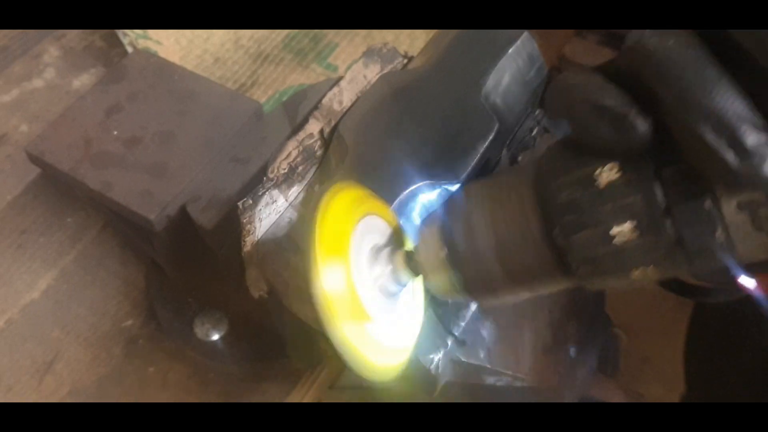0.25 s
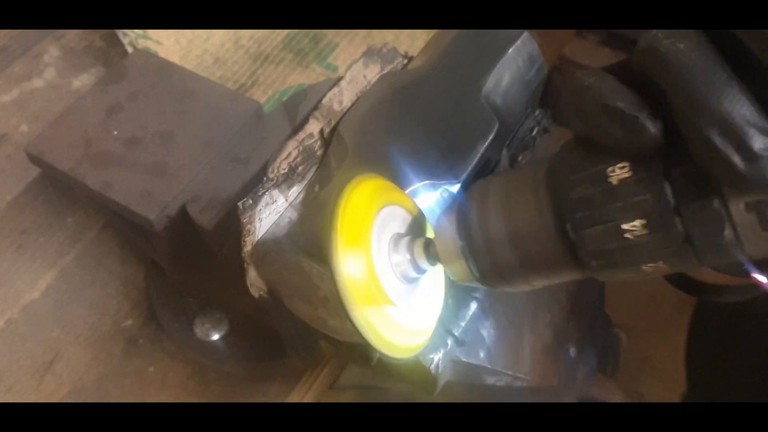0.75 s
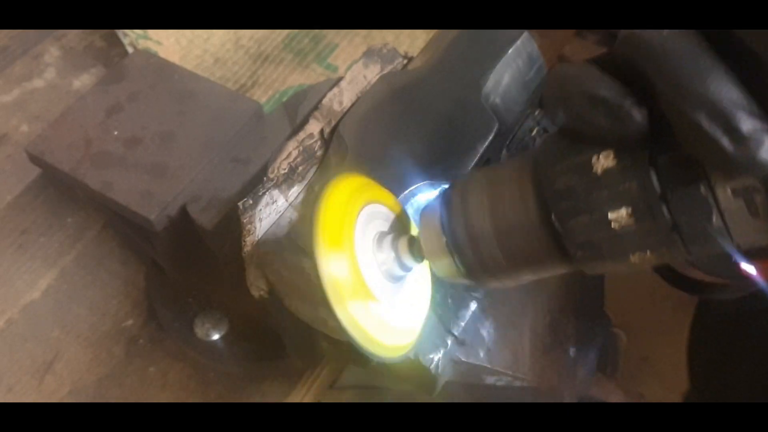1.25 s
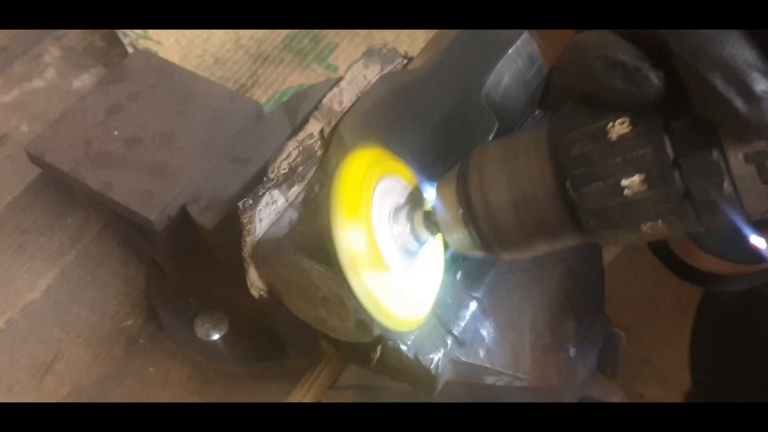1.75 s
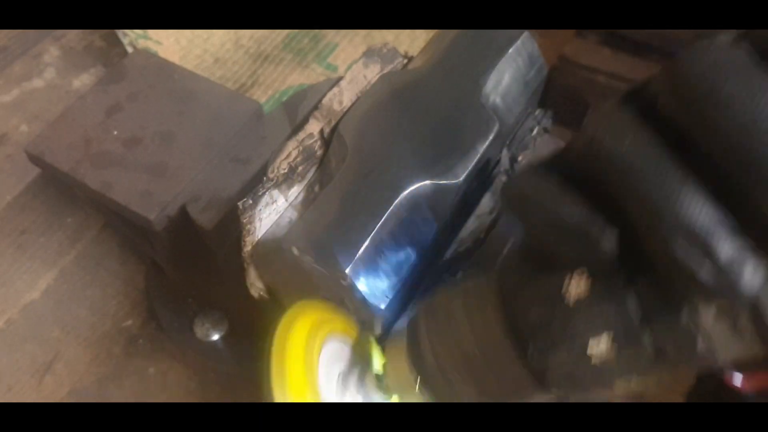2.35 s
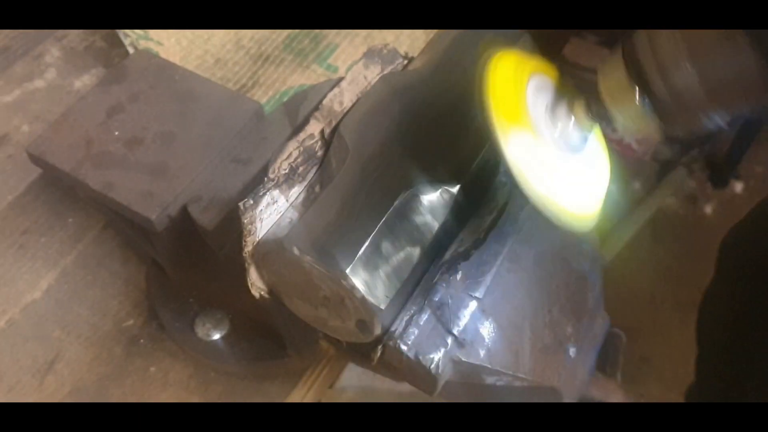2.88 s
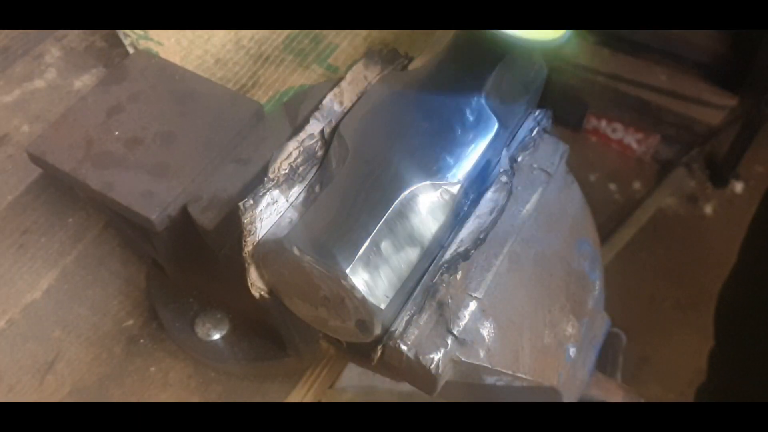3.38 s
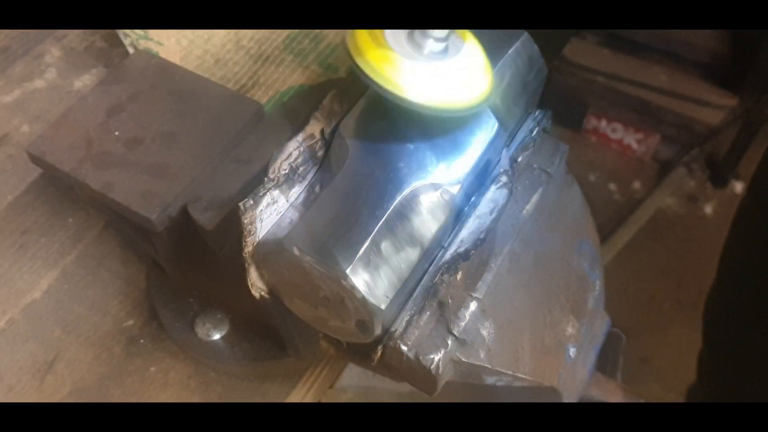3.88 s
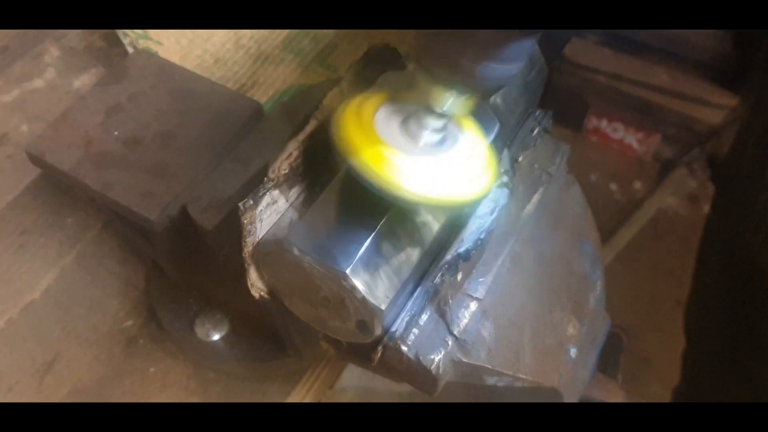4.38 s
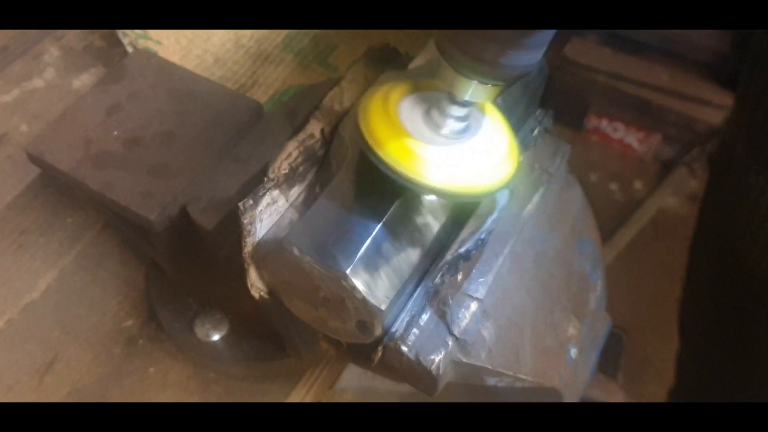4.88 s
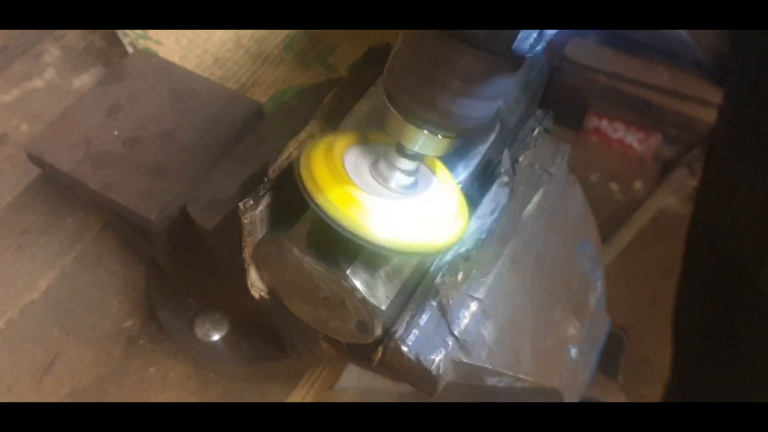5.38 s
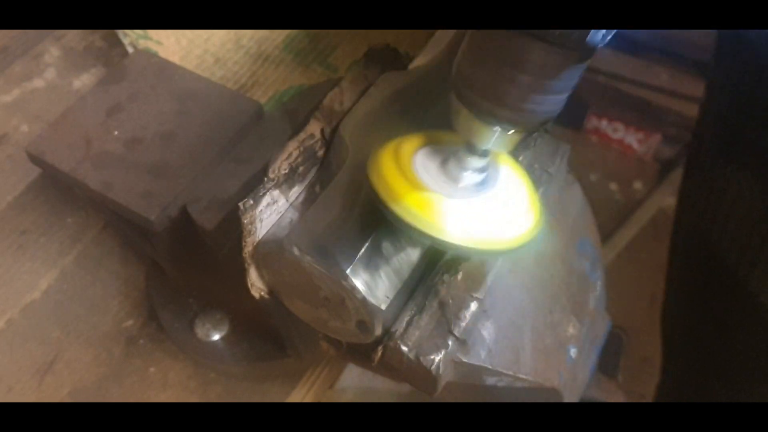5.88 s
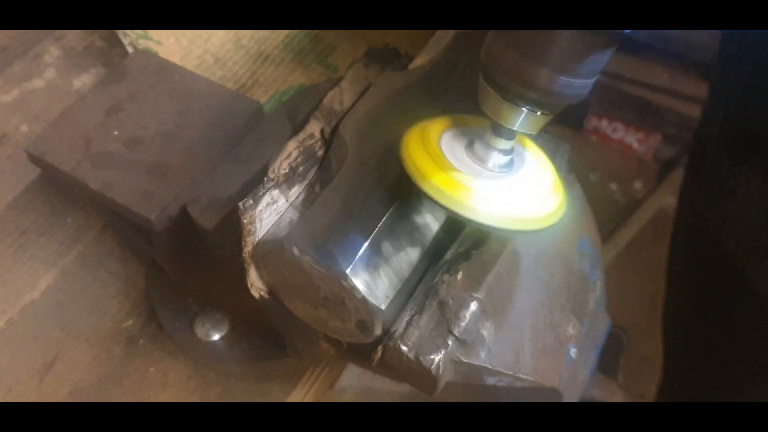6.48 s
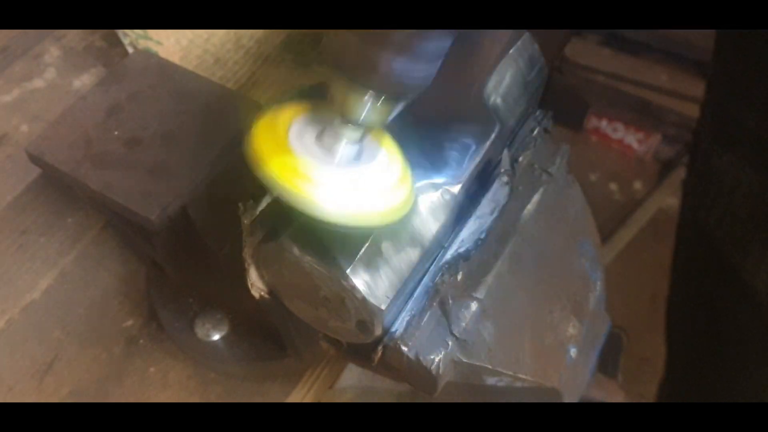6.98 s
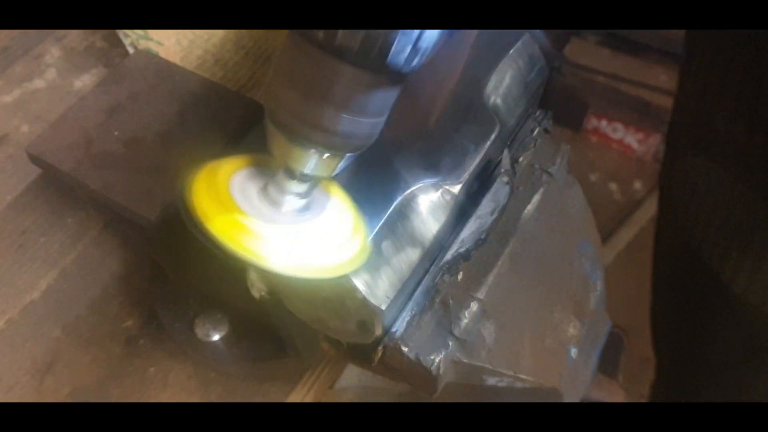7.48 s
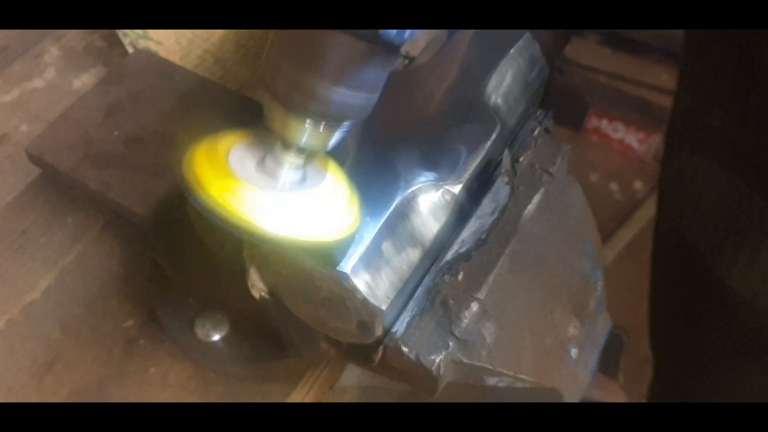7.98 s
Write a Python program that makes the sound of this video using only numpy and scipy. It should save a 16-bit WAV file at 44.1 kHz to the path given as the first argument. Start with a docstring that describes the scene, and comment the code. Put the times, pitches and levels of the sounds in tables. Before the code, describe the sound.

Workshop bench, close and dry: a steady, bright motor whine with a fast-throbbing rubbing hiss on steel, strongly on the left. On the right the drill is muffled, with irregular puffs of air from the spinning pad until about three seconds. The pitch rises a little when the drill lifts off, then sags slightly as it presses upright, with a faint low hum.

```python
"""A cordless drill whines close to the left microphone, polishing a steel hammer head held in a vice.
Motor shaft orders make the whine; low chuck orders hum, and throbbing noise is the fan, gear and pad hiss.
The drill starts sideways, lifts off and runs free, then leans and stands upright on the steel, turning slower.
The right microphone is nearly blocked: it hears a faint dull drill and the thumping air thrown by the pad."""
import sys
import numpy as np
from scipy import signal
from scipy.fft import rfft, irfft, next_fast_len
from scipy.io import wavfile
from scipy.ndimage import uniform_filter1d

SR = 44100
rng = np.random.default_rng(int(sys.argv[2]) if len(sys.argv) > 2 else 0)


def waveform_to_disk(signal):
    """Save audio, clipped to [-1, 1], as 16-bit WAV at the path in sys.argv[1]."""
    frames = np.transpose(np.atleast_2d(signal))
    scaled = np.clip(frames, -1, 1) * 32767
    samples = np.round(scaled).astype(np.int16)
    wavfile.write(sys.argv[1], SR, samples)


N = 363384
T = np.arange(N) / SR  # s
GEAR = 15  # shaft turns per chuck turn


def whine(turn, pose):
    """Sines at multiples of the shaft speed; bearings and brushes make each waver in level and phase."""
    # strong shaft orders: order, level/dB sideways, lifted, leaning, upright
    strong_orders = [(1, -39.3, -37.8, -39, -39.5), (2, -44, -34.5, -38.5, -37), (3, -40, -46, -43, -45),
                     (4, -33, -32.3, -30, -27.5), (5, -36.5, -42, -42, -42), (10, -32, -32.5, -33.5, -34)]
    # weaker shaft orders: order, level/dB sideways, lifted, leaning, upright
    weak_orders = [(6, -46, -67, -58, -61), (7, -50, -46, -43, -42), (8, -47, -43, -51, -45),
                   (9, -45, -48, -44, -52), (11, -46, -43, -43, -49), (12, -48, -67, -49, -46),
                   (13, -42, -44, -45, -44), (14, -56, -42, -46, -51), (15, -44, -47, -44, -48),
                   (16, -43, -47, -48, -51), (17, -51, -65, -53, -48), (18, -52, -55, -60, -53),
                   (19, -59, -54, -54, -53), (20, -56, -53, -56, -55), (21, -56, -65, -58, -62),
                   (22, -58, -58, -56, -59), (24, -60, -67, -67, -65), (25, -58, -67, -67, -67),
                   (30, -49, -52, -53, -56), (31, -61, -59, -59, -63), (32, -67, -59, -65, -64),
                   (33, -61, -57, -53, -54), (34, -44, -46, -45, -55), (35, -52, -53, -53, -54),
                   (36, -50, -49, -48, -53), (37, -50, -52, -50, -55), (38, -55, -50, -51, -50),
                   (39, -49, -52, -50, -57), (40, -49, -47, -47, -50), (41, -52, -51, -45, -46),
                   (42, -52, -51, -51, -58), (43, -59, -64, -51, -55), (44, -53, -57, -54, -51),
                   (45, -57, -53, -49, -49), (46, -55, -57, -56, -58), (47, -65, -62, -61, -58),
                   (48, -59, -62, -66, -62), (49, -56, -60, -61, -63), (50, -54, -57, -56, -56),
                   (51, -53, -60, -59, -58), (52, -67, -67, -55, -55)]
    out, share = np.zeros(N), shares(pose, count=4)
    for order, *pose_db in strong_orders:
        level = amp(np.dot(pose_db, share) + swell(round(order)) + 0.86 * drift(25))
        phase = round(order) * turn + 0.22 * drift(15) + 2 * np.pi * rng.random()
        out += level * np.sqrt(2) * np.sin(phase)
    for order, *pose_db in weak_orders:
        waver_db = 1.5 * drift(2) + 1.2 * drift(25)
        level = amp(np.dot(pose_db, share) + swell(order) + waver_db)
        phase = order * turn + .2 * drift(15) + 2 * np.pi * rng.random()
        out += level * np.sqrt(2) * np.sin(phase)
    return out


def swell(order):
    """Summed dB change of one order: smooth bumps in time as the drill shifts against the steel."""
    # swells and dips of single tones: t/s, shaft order, half length/s (to 1/e), level change/dB
    bumps = [(.1, 10, .3, 1.5), (.2, 2, 0.39, 5.5), (.9, 10, 0.29, -3.5), (1.3, 2, 0.11, 4.5),
             (1.45, 10, .22, 0.5), (2.1, 10, 0.34, -4), (2.605, 4, 0.16, 4), (2.618, 2, 0.12, 4.5),
             (2.7, 10, 0.25, 4), (3.0, 4, 0.31, -1.5), (3.032, 2, 0.12, -15.5), (3.05, 3, 0.12, -13),
             (3.096, 1, .07, 3), (3.1, 5, .07, -3), (3.098, 10, 0.084, -8), (3.75, 5, 0.11, -10),
             (3.88, 3, .1, -8), (3.897, 10, 0.12, 2.5), (3.9, 2, .15, 3), (4.05, 5, .07, -6),
             (4.27, 4, 0.19, -3.5), (6.28, 3, .22, -11), (6.5, 2, 0.32, -2.5), (7, 5, .15, -6),
             (8.24, 4, .07, -7), (.1, 15, .25, -10), (2.55, 15, 0.14, 0), (2.55, 16, .15, 5),
             (3.148, 15, .15, 4), (3.85, 14, 0.13, -5), (4.05, 16, .18, 4)]
    return sum(db * np.exp(-((T - s) / half) ** 2) for s, which, half, db in bumps if round(which) == order)


def chuck(turn):
    """The unbalanced pad hums into the vice and bench at multiples of the chuck speed."""
    # make-up of the hum: chuck order, relative level/dB
    chuck_orders = [(3, -10), (4, -0.5), (12, -10), (16, -4)]
    # course of the hum: t/s, level/dB
    hum_db = [(0, -60), (2.45, -59), (2.68, -69), (3.05, -66), (3.6, -62), (3.9, -56), (4.4, -54),
              (5.1, -60), (5.25, -57), (6.5, -52.5), (7, -54), (7.3, -55), (8.15, -56), (8.24, -64)]
    hum = np.zeros(N)
    for order, db in chuck_orders:
        level = amp(db + 1.8 * drift(8))
        hum += level * np.sin(round(order) * turn / GEAR + .4 * drift(6.2))
    return np.sqrt(2) * amp(curve(hum_db)) * hum


def hiss(turn, pose):
    """Fan, gears and rubbing pad: noise that throbs with every shaft turn and every pad turn."""
    # hiss spectrum before the level course: f/Hz, level/dB per Hz sideways, lifted, leaning or upright
    spectrum = [(40, -87, -86.6, -93), (200, -85.5, -83.5, -82.5), (417, -75.5, -74.5, -72),
                (500, -69.5, -71.5, -69), (730, -73, -73, -70), (830, -70.5, -67, -65),
                (1310, -61, -63.5, -62.5), (1510, -63, -67, -65), (2480, -66, -64.5, -63),
                (3540, -66, -64.5, -61), (5070, -66.5, -71.5, -70.5), (6650, -77, -81, -78),
                (7700, -88, -87, -87.5), (8860, -84.5, -87.5, -88.5), (11320, -73.5, -74, -72.5),
                (13700, -77.5, -80, -79.5)]
    # course of the hiss: t/s, level change/dB
    course_db = [(0, -0.5), (1.1, .4), (2.2, -.4), (2.6, 0), (3.5, -1), (3.85, 0), (4.2, -.8), (5.8, 0),
                 (6.4, -1), (7, -0.5), (7.8, .5), (8.12, 0.5), (8.24, -1)]
    shaft_throb = 0.13 * np.cos(turn) + 0.06 * np.cos(2 * turn + 0.92) + 0.042 * np.cos(3 * turn + 1.5)
    throb = 1 + shaft_throb + 0.027 * np.cos(turn / GEAR)
    white = rng.standard_normal(N) * np.sqrt(SR / 2)  # unit power per Hz
    noise = throb * amp(.5 * drift(8)) * white
    coloured = posed(patchy(noise, patchy_db=0.92), spectrum, np.minimum(pose, 2))
    return amp(curve(course_db)) * coloured


def patchy(x, patchy_db):
    """Lets small patches of time and frequency swell and fade, as the pad bites unevenly."""
    z = signal.stft(x, nperseg=256)[2]
    patches = uniform_filter1d(rng.standard_normal(z.shape), size=5, axis=0)  # across frequency
    patches = uniform_filter1d(patches, size=8, axis=1)  # along time
    gain = amp(patchy_db * patches / patches.std())
    return signal.istft(z * gain, nperseg=256)[1][:N]


def draught():
    """Each puff is a short soft swing with a quick edge and stirs up low turbulence around it."""
    # spectrum of the turbulence: f/Hz, relative level/dB
    air_spectrum = [(15, -30), (30, -17), (55, -1), (90, -12), (180, -25), (300, -32), (2000, -80)]
    # strong puffs that thump the right microphone: t/s, envelope peak level/dB, settled f/Hz
    strong_puffs = [(.482, -45, 55.4), (.895, -38, 70), (1.232, -38, 75), (1.402, -38, 90), (1.47, -39, 90),
                    (1.503, -32, 85), (1.572, -30, 101), (1.59, -31, 90), (1.626, -32, 130),
                    (1.66, -37, 70), (1.703, -38, 151), (1.723, -32, 78), (1.793, -41, 75),
                    (1.855, -41, 65), (1.937, -32, 70), (1.985, -34, 100), (2.022, -36, 90),
                    (2.072, -36, 110), (2.114, -35, 101), (2.13, -30, 94), (2.18, -35.5, 140),
                    (2.499, -34, 65), (2.535, -44, 80), (2.567, -39, 120), (3.042, -32, 94.5),
                    (3.09, -35, 99)]
    rumble = colour(rng.standard_normal(N), air_spectrum)
    out, stir, t = np.zeros(N), np.zeros(N), np.arange(4000) / SR
    puffs = strong_puffs + small_puffs()
    for (s, db, hz), phase in zip(puffs, rng.random(len(puffs))):
        u = t * hz / .6  # the envelope peaks 0.6 of a cycle in
        shape = amp(db) * u * np.exp(1 - u)
        swing = np.sin(2 * np.pi * (hz * t + phase - 0.68 * np.exp(-t / 0.0024)))  # starts fast, then slows
        start = round(s * SR)
        out[start:][:len(t)] += shape * swing
        stir[start:][:len(t)] += shape
    turbulence = uniform_filter1d(stir, size=3000) * rumble / rumble.std()
    return out + amp(-2.5) * turbulence


def small_puffs():
    """Rows like those of the strong puffs, scattered while the pad blows towards the microphone."""
    # gusts: start t/s, end t/s
    gusts = [(.87, 1.0), (1.12, 1.46), (2.2, 2.26), (2.43, 2.49), (3.0, 3.03), (3.13, 3.19)]
    gap_s = .045
    middle_db, spread_db, low_hz, high_hz = -47.5, 3, 55, 110
    at = np.concatenate([np.arange(start, end, gap_s) for start, end in gusts])
    late, size, pitch = rng.random((len(at), 3)).T
    times = at + gap_s * late / 2
    levels = middle_db + spread_db * (2 * size - 1)
    return list(zip(times, levels, low_hz + (high_hz - low_hz) * pitch))


def amp(db):
    """Decibels to gain."""
    return 10 ** (np.asarray(db) / 20)


def curve(rows, column=1):
    """One column of a table at every sample."""
    return np.interp(T, np.array(rows)[:, 0], np.array(rows)[:, column])


def colour(x, points, column=1):
    """Filters x by one dB column of a table whose first column is Hz."""
    size = next_fast_len(N)
    hz, p = np.fft.rfftfreq(size, 1 / SR), np.array(points)
    gain = amp(np.interp(np.log(hz + 1), np.log(p[:, 0]), p[:, column]))
    return irfft(rfft(x, size) * gain, size)[:N]


def drift(per_s):
    """Slow chance of about rms 1; a higher per_s wanders faster."""
    knots_hz = 400
    knots = rng.standard_normal(int(N / SR * knots_hz) + 2)
    knots = uniform_filter1d(knots, max(int(knots_hz / per_s), 1))
    return np.interp(T * knots_hz, np.arange(len(knots)), knots / knots.std())


def shares(pose, count):
    """How much of each of count poses is heard; neighbours fade into each other."""
    return [np.clip(1 - abs(pose - k), 0, 1) for k in range(count)]


def posed(x, table, pose):
    """Colours x by every pose and fades between them."""
    parts = shares(pose, len(table[0]) - 1)
    return sum(share * colour(x, table, column=k + 1) for k, share in enumerate(parts))


def scene():
    """The drill at the open left microphone; a dull, partly scattered share and the draught at the right."""
    # the motor sags under the pad's load and runs free when lifted: t/s, shaft f/Hz
    shaft_speed = [(0, 304.7), (.3, 304.6), (.5, 303.2), (1, 303.1), (1.4, 304.2), (1.62, 303.4),
                   (2.35, 303.2), (2.55, 306.1), (3.1, 306.9), (3.75, 306.8), (4.0, 305.0), (4.3, 301.6),
                   (4.5, 300.5), (4.7, 300.4), (4.87, 299.2), (5.05, 298.6), (5.3, 296.4), (5.7, 296.3),
                   (6.15, 295.1), (6.5, 295.0), (6.85, 296.4), (7.2, 295.8), (8.24, 294.6)]
    # how the drill is held: t/s, pose (0 sideways, 2 leaning, 3 upright on the steel; 1 lifted)
    poses = [(0, 0), (2.65, 0), (2.78, .6), (3.1, 1), (3.9, 1), (4.3, 2), (5.1, 2), (5.6, 3)]
    # what the blocked right microphone lets through: f/Hz, level/dB sideways, level/dB in the other poses
    blocked = [(60, -13, -19), (200, -14, -14), (300, -16.5, -22.5), (614, -27, -27), (900, -39, -40),
               (1250, -33, -37), (1820, -31.5, -41), (2880, -26, -30.5), (3500, -50, -44),
               (4800, -32.5, -45), (7900, -31, -35), (9500, -40, -37), (11800, -19, -27.5),
               (15700, -30, -27)]
    lead = 6  # samples by which the right microphone hears the sideways drill first
    pose = curve(poses)
    turn = 2 * np.pi * np.cumsum(curve(shaft_speed)) / SR  # shaft angle in radians
    turn = turn + .022 * drift(30)  # the shaft runs a little unevenly, which blurs the high orders most
    tones = whine(turn, pose) + chuck(turn)
    near, scattered = hiss(turn, pose), hiss(turn, pose)  # two independent hisses
    direct, sideways = .8 * tones + .35 * near, shares(pose, count=1)[0]
    arriving = sideways * np.roll(direct, -lead) + (1 - sideways) * direct
    through = arriving + .95 * scattered
    right = posed(through, blocked, np.minimum(pose, 1)) + draught()
    return np.array([tones + near, right])


def record(dry):
    """A steep low-pass limits the band of both microphones."""
    edge_hz = 15740
    lowpass = signal.firwin(2047, edge_hz, window=("kaiser", 9), fs=SR)
    return signal.oaconvolve(dry, lowpass[None], "same")


dry = scene()
out = record(dry)
waveform_to_disk(out)
```